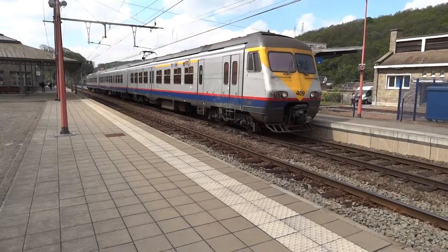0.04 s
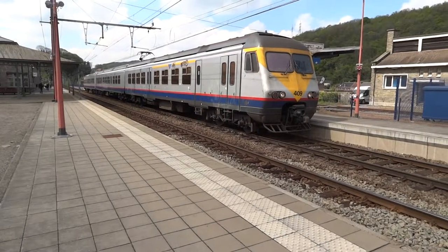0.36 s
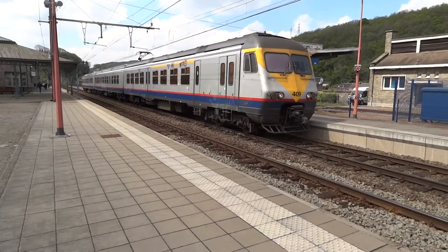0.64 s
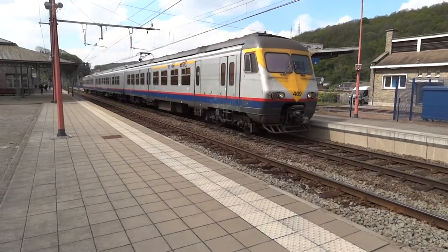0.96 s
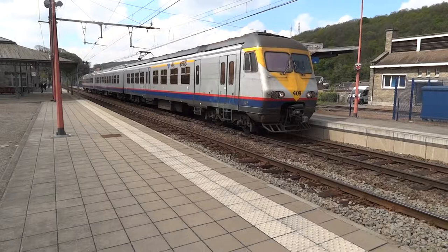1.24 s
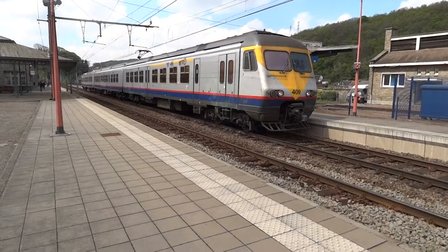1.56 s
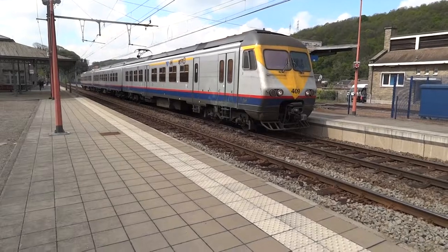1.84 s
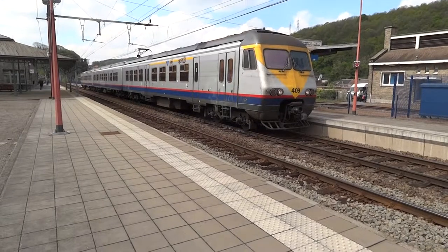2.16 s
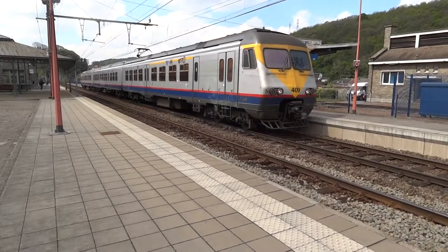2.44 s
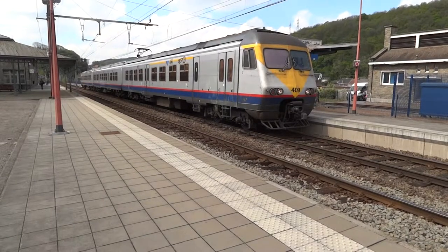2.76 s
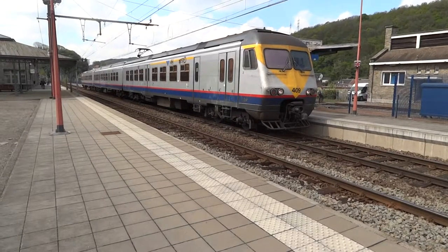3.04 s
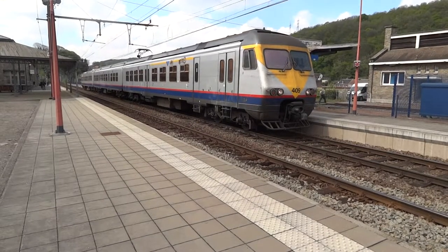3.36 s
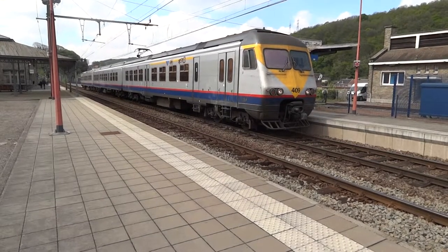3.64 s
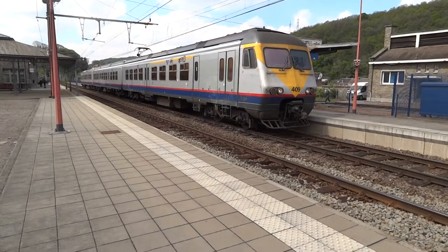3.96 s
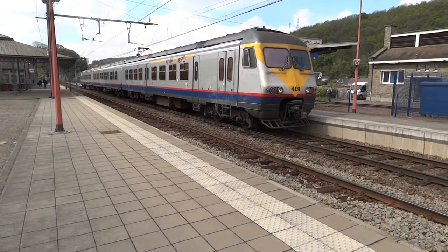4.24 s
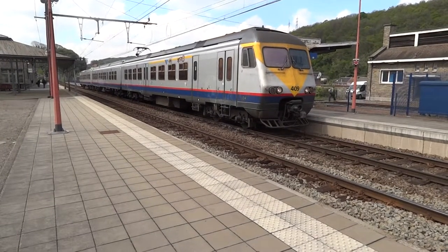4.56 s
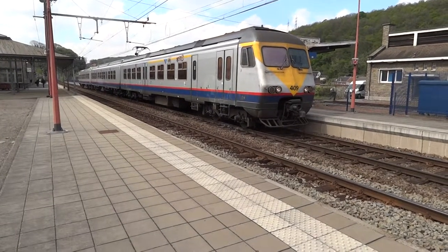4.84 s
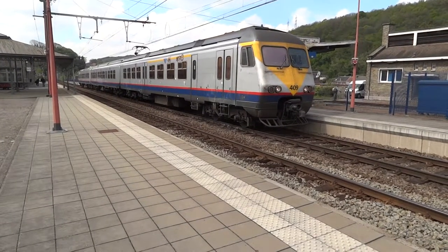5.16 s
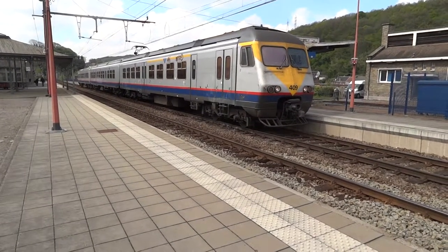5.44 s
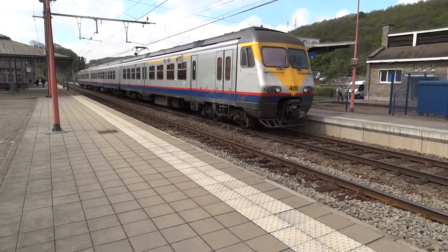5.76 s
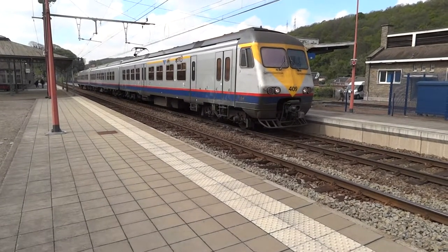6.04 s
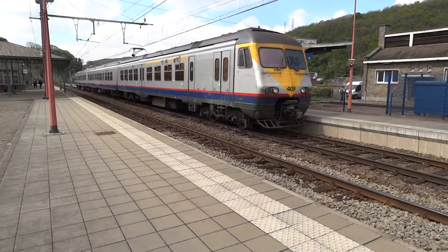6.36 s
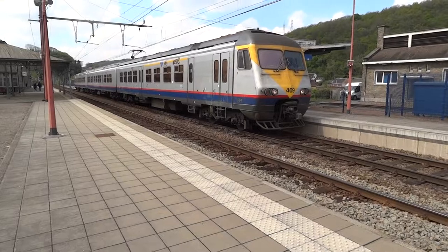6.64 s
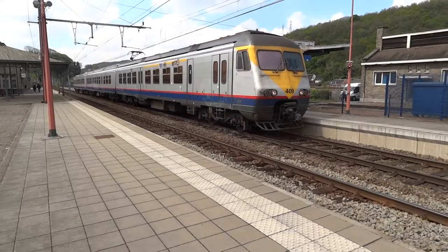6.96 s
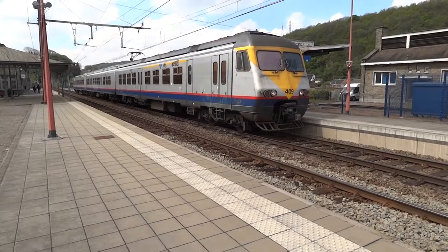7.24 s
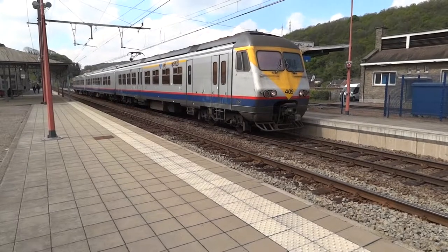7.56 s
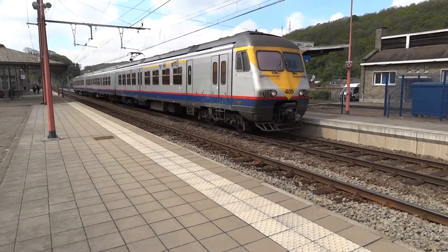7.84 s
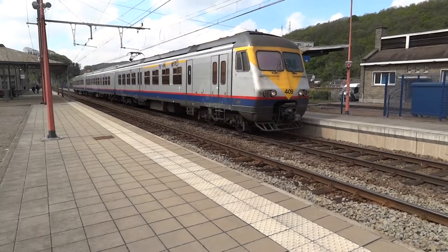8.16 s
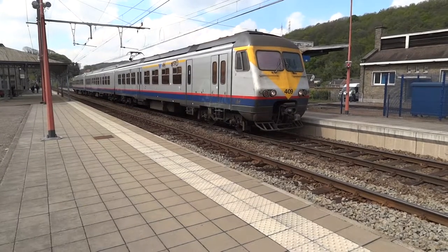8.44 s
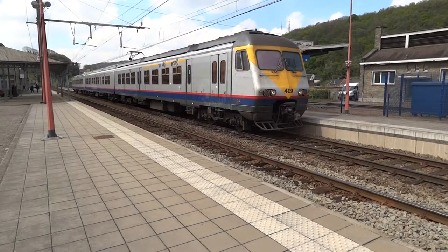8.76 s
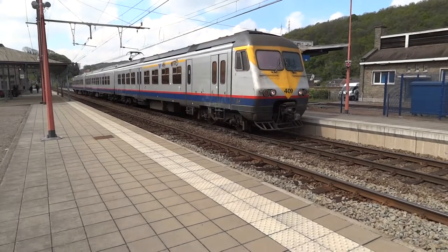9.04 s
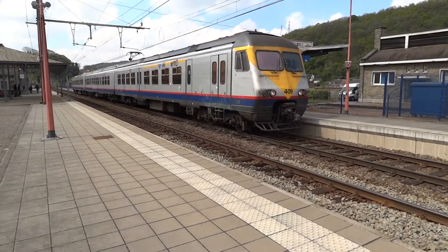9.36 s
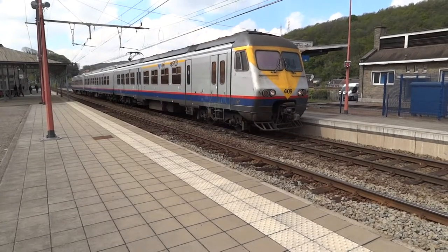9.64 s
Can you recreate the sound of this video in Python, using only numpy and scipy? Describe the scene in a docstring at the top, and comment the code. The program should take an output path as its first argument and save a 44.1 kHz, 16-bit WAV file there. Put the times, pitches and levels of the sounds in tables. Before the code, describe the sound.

An electric train stands at an open-air platform. Throughout, its steady, many-toned whine sits slightly to the right, over the rush and low hum of cooling fans. Fingers knock and rub on a hand-held camera right at the microphone: a sharp cluster in the first half second, light taps near 1.4 and 2.5 seconds, stronger knocks around 5.1, 5.4 and 6.1, and smaller ones near 7.1 and 9. The camera's zoom motor makes a thin, rapid ticking from about 2.2 to 4.3 seconds and starts again at 9.7. A soft low rumble swells around 3.6 seconds, then more weakly near 7 and 9. Small birds twitter faintly with a slight echo from the walls, whistling and trilling around 1.4 to 2 seconds, chirping sparsely afterwards, and growing busier from 8.2 to 9 with a run of paired chirps.

```python
"""Open-air station platform. A standing electric train's converter whines on harmonics of 269 Hz
over the rush and hum of cooling fans; a low rumble swells and fades. Small birds twitter nearby,
echoed by the walls. Fingers knock and rub on a hand-held camera, ringing its case; its zoom motor
ticks for two seconds and starts again at the very end."""
import sys
import numpy as np
from scipy import signal
from scipy.fft import rfft, irfft
from scipy.io import wavfile
from scipy.ndimage import uniform_filter1d

SR = 44100
rng = np.random.default_rng(int(sys.argv[2]) if len(sys.argv) > 2 else 0)


def unload_audio(sound):
    """Save the sound as a 16-bit wav file, at the path given as the first command line argument."""
    columns = np.transpose(np.atleast_2d(sound))
    # keep every value between -1 and 1, then stretch to whole-number steps
    steps = np.round(np.clip(columns, -1, 1) * 32767)
    wavfile.write(sys.argv[1], SR, steps.astype(np.int16))


N = 431738
TIME = np.arange(N) / SR


# switching rate: t/s, f/Hz
SWITCHING = [(0, 268.68), (5.8, 269.24), (9.79, 269.0)]
# steady harmonics: multiple, level/dB
HARMONICS = [(3, -73.5), (4, -61.5), (5, -65), (6, -61.5), (7, -60), (8, -71), (9, -68), (10, -71.5),
             (11, -69), (14, -55), (15, -59.5), (16, -67), (17, -64), (18, -63), (19, -78), (20, -73),
             (21, -70), (22, -62), (23, -61.5), (25, -59), (26, -74), (27, -84), (28, -79), (29, -88.5),
             (31, -87), (33, -84.5), (35, -89.5)]
# swelling harmonics: t/s, level before trim/dB
LEVEL_12TH = [(0.5, -55.5), (5.08, -59.5), (7.02, -57.5), (9.79, -63.5)]
LEVEL_13TH = [(0.45, -52), (1.46, -49.5), (5.11, -53.5), (5.39, -49.5), (8.64, -43.5), (9.79, -46.5)]
LEVEL_24TH = [(0.45, -53), (0.89, -63), (5.42, -53), (5.62, -56.5), (9.21, -53.5), (9.79, -59)]
# multiple, level curve, trim/dB
STRONGEST = [(12, LEVEL_12TH, 6.5), (13, LEVEL_13TH, 3.5), (24, LEVEL_24TH, -0.5)]

def converter(fade_db=1.6, flutter_db=0.4, waver_rad=0.14, pan_db=-2.5, wander_db=-2.9, left_lag_s=26e-6):
    """Switching harmonics from the right; moving air makes each flutter and shift between the ears."""
    hz = in_time(SWITCHING)
    phase = 2 * np.pi * (np.cumsum(hz) / SR - hz.mean() * np.array([[left_lag_s], [0]]))
    levels = [(k, db + fade_db * drift(0.57)) for k, db in HARMONICS]
    levels += [(k, in_time(curve) + trim_db) for k, curve, trim_db in STRONGEST]
    out = np.zeros((2, N))
    for k, db in levels:
        tone = np.sqrt(2) * np.sin(k * phase + rng.uniform(0, 2 * np.pi) + waver_rad * drift(2.7))
        gain = from_db(db + flutter_db * drift(7.9))
        out += tone * panned(gain, pan_db + wander_db * drift(0.57))
    return out


# air rush: f/Hz, density/(dB per Hz)
FAN_SPECTRUM = [(25, -69.5), (40, -71), (56, -66), (95, -72), (145, -76.5), (220, -66.5), (320, -75),
                (520, -82.5), (820, -78), (1300, -86.5), (2600, -91.5), (4200, -88.5), (7500, -109),
                (15000, -120)]
# fan and duct resonances: f/Hz, nominal width/Hz, relative level/dB
DUCT_MODES = [(55.3, 5.5, -61), (81.8, 2.3, -57.5), (112.5, 4.4, -57), (269.6, 6.1, -56), (411.2, 13, -56),
              (546, 10.5, -64.5), (810, 6.7, -55), (872, 9.3, -59.5), (11940, 130, -76)]

def fans(unrest_db=1.39, duct_db=-4.5):
    """Broad rush of cooling air with humming duct resonances."""
    hum = sum(from_db(db + duct_db) * noise_band(hz, 1.74 * width) for hz, width, db in DUCT_MODES)
    return wide(FAN_SPECTRUM) * from_db(unrest_db * drift(2.95)) + hum


# t/s, level/dB, f/Hz, hardness (overtone over fundamental)/dB
KNOCKS = [(.130, -22, 400, -18), (.148, -15.5, 205, -30), (0.1529, -11, 303, -25), (.171, -17, 224, -10),
          (.210, -19, 1010, 2), (.2268, -9, 1200, 28), (.2305, -14.5, 900, 4), (.2622, -17, 335, -1),
          (.268, -17.5, 179, -3), (.402, -11, 275, -5), (.4083, -13, 1050, 12), (1.382, -24, 227, -2),
          (1.467, -25.5, 274, -7), (2.461, -19, 1280, 11), (2.7815, -33, 1800, -6), (4.329, -32, 1550, 20),
          (4.512, -29, 560, 12), (4.9405, -33, 2600, 12), (5.1478, -10.5, 427, 11),
          (5.198, -28.5, 262, -20), (5.358, -19.5, 302, -4), (5.3728, -19, 1400, -2),
          (6.1269, -11.5, 1220, 3), (6.193, -27.5, 364, -16), (6.533, -26.5, 375, -3),
          (6.855, -35, 2200, 12), (7.109, -23, 370, 0), (7.18, -18.5, 238, -28), (9.0274, -25, 396, -5.5)]

def knocks(overtone_ratio=2.84, damping=0.71, rattle=0.41, rattle_s=0.0014,
           edge_hz=3600, edge_width_hz=4000, edge_db=-14.5, lag_cycles=0.14, lag_corner_hz=3000):
    """A finger rings the case for about two cycles; harder touches add an overtone and a crisp edge."""
    out, t = np.zeros((2, N)), TIME[:SR // 20]
    for s, db, pitch_hz, hard_db in KNOCKS:
        noise = rng.standard_normal(len(t)) + rng.standard_normal((2, len(t)))
        loose = rattle * np.exp(-t / rattle_s) * noise
        low_db, high_db = db - max(hard_db, 0), db + min(hard_db, 0)
        overtone_hz = overtone_ratio * pitch_hz
        for hz, ring_db in (pitch_hz, low_db), (overtone_hz, high_db):
            force = (t == 0) + loose * hz / (hz + edge_hz)
            body = resonate(resonate(force, hz, damping * hz), hz, 2 * hz)
            # left channel slightly after the right; the lag shrinks as pitch rises
            lag_s = lag_cycles / hz / (1 + (hz / lag_corner_hz) ** 2)
            body[0] = np.interp(t - lag_s, t, body[0], left=0)
            add(out, s, from_db(ring_db) * peak_one(body))
        # duller edge on low touches
        edge = resonate((t == 0) + loose, np.sqrt(overtone_hz * edge_hz), edge_width_hz)
        edge = resonate(edge, edge_hz / 2, 2 * edge_width_hz)
        add(out, s, from_db(high_db + edge_db) * peak_one(edge))
    return out


# slides: centre t/s, half length/s, level/dB
RUBS = [(.224, 0.017, -32), (0.267, 0.0073, -31), (0.34, 0.33, -48.5), (5.366, 0.012, -32),
        (5.395, 0.066, -42.5), (5.535, 0.056, -41), (5.6, 0.17, -48), (6.67, 0.02, -45),
        (9.319, 0.0091, -46), (9.373, 0.082, -49)]
# friction: f/Hz, relative density/dB
RUB_SPECTRUM = [(150, 2.5), (400, -8.5), (1600, -3), (3000, -7), (5000, -7), (7500, -18.5), (15000, -35)]
# f/Hz, width/Hz, gain/dB
CASE_MODES = [(500, 91, 2.5), (1680, 380, -13.5)]

def rubs(grain_db=1.5):
    """Sliding skin makes grainy friction that rings the hollow case."""
    friction = swells(RUBS) * rms_one(wide(RUB_SPECTRUM) * from_db(grain_db * drift(170)))
    return friction + sum(from_db(db) * resonate(friction, hz, width) for hz, width, db in CASE_MODES)


# lever pushes: t/s, length/s
ZOOM_PUSHES = [(2.2297, .99), (3.2297, 1.09), (9.7085, 1.0)]
# beep choices: f/Hz
BEEPS_HZ = (7620, 8010, 8010, 8010, 8010, 8010, 8410, 8410)
# f/Hz, relative density/dB
WHIRR_SPECTRUM = [(2000, -27), (3300, -9), (4200, 10), (5000, 12), (5900, 8), (7000, -15), (9500, -14),
                  (10800, -5), (15000, -36)]

def zoom_motor(steps_per_s=50, tick_hz=4400, tick_width_hz=1100, weak_db=-4, beep_db=-29, whirr_db=-26,
               level_db=-37, swell_db=4.5, peak_share=.72):
    """The lens steps in weak and strong ticks over a whirr, beeping on the strong; each push swells."""
    steps, effort, t = np.zeros(N), np.zeros(N), TIME[:SR // steps_per_s]
    for start, length in ZOOM_PUSHES:
        for k, s in enumerate(np.arange(start, min(start + length, TIME[-1]), 1 / steps_per_s)):
            strong = k % 2
            hz = tick_hz * (1 + rng.normal(0, 0.05))
            tick = resonate(resonate(1.0 * (t == 0), hz, tick_width_hz), hz, tick_width_hz)
            tick_db = (0 if strong else weak_db) + rng.normal(0, 1.5)
            add(steps, s, from_db(tick_db) * peak_one(tick))
            push = np.interp((s - start) / length, [0, peak_share, 1], [0, 1, 0])
            add(effort, s, np.full(len(t), from_db(level_db + swell_db * push)))
            if strong:
                beep = np.sin(2 * np.pi * rng.choice(BEEPS_HZ) * t) * signal.windows.tukey(len(t), .15)
                add(steps, s, from_db(beep_db) * beep)
    return effort * (steps + from_db(whirr_db) * rms_one(wide(WHIRR_SPECTRUM)))


def bird_note(length_s, start_hz, top_hz, end_hz, turn, db, quaver=0.008):
    """A whistle that tops out at share `turn` of its length, then drops; strong quaver makes it rasp."""
    u = np.linspace(0, 1, int(length_s * SR))
    climb = (start_hz - top_hz) * np.abs(1 - u / turn) ** 1.5
    fall = (end_hz - top_hz) * np.abs((u - turn) / (1 - turn)) ** 1.5
    jitter = rms_one(uniform_filter1d(rng.standard_normal(len(u)), size=60))
    hz = (top_hz + np.where(u < turn, climb, fall)) * (1 + quaver * jitter)
    return from_db(db) * signal.windows.tukey(len(u), .12) * np.sin(2 * np.pi * np.cumsum(hz) / SR)


# t/s, length/s, relative level/dB
CHIRPS = [(.882, .058, -49), (2.632, .046, -45), (4.843, .04, -47), (6.54, .046, -42), (7.385, .048, -46),
          (8.355, .044, -42), (8.448, .048, -37)]
# start f/Hz, top f/Hz, end f/Hz, turn/share
CHIRP_SHAPE = (4150, 5250, 3850, .76)
# t/s, length/s, top f/Hz, turn/share, relative level/dB
WHISTLES = [(1.41, .1, 4400, .5, -44), (1.585, .075, 4950, .25, -40), (1.745, .038, 5150, .7, -42),
            (4.882, .028, 5200, .7, -49), (4.93, .055, 5100, .9, -51), (8.222, .04, 4550, .85, -38)]
# t/s, length/s, top f/Hz, end f/Hz, relative level/dB
RASPS = [(8.194, 0.026, 4850, 4100, -40), (8.326, 0.095, 6030, 5730, -50),
         (8.421, 0.047, 4840, 3940, -36.5)]
# start t/s, end t/s, rate/(notes per s), first and last relative level/dB
TRILLS = [(1.785, 1.937, 60, -40, -47), (8.165, 8.203, 56, -43, -45)]
# a farther bird's low, rough answers: t/s
ANSWERS_S = [1.7, 2.31, 2.69, 3.66, 6.62, 7.46, 8.451]
# trill and answer notes: length/s, start f/Hz, top f/Hz, end f/Hz, turn/share
TRILL_SHAPE = (0.0066, 3100, 4850, 4150, 0.082)
ANSWER_SHAPE = (.1, 3050, 3100, 2800, .2)

def birds(level_db=-2, pan_db=-5, echo_db=-5.5, echo_s=0.065, rasp=0.045, whistle_sag=.15,
          run_start_s=8.534, pair_every_s=.154, pair_gap_s=.069, run_chirp_s=.038, run_db=-40.5):
    """Chirps, whistles, rasps, trills and a closing run of paired chirps, scattered by station walls."""
    song = np.zeros(N)
    run = [(run_start_s + k // 2 * pair_every_s + k % 2 * pair_gap_s, run_chirp_s, run_db)
           for k in range(6)]
    for s, length, db in CHIRPS + run:
        *pitches, turn = CHIRP_SHAPE
        detune = 1 + .008 * rng.standard_normal()
        add(song, s, bird_note(length, *np.array(pitches) * detune, turn, db))
    for s, length, hz, turn, db in WHISTLES:
        start_hz, end_hz = hz * (1 - whistle_sag * turn), hz * (1 - whistle_sag * (1 - turn))
        add(song, s, bird_note(length, start_hz, hz, end_hz, turn, db))
    for s, length, hz, end_hz, db in RASPS:
        add(song, s, bird_note(length, hz, hz, end_hz, turn=0.136, db=db, quaver=rasp))
    for s in ANSWERS_S:
        add(song, s, bird_note(*ANSWER_SHAPE, db=-54, quaver=rasp))
    for start, end, per_s, first_db, last_db in TRILLS:
        for s in np.arange(start, end, 1 / per_s):
            add(song, s, bird_note(*TRILL_SHAPE, db=np.interp(s, [start, end], [first_db, last_db])))
    walls = rng.standard_normal((2, SR // 2)) * np.exp(-TIME[:SR // 2] / echo_s)
    echo = signal.fftconvolve(song[None], walls / np.linalg.norm(walls[0]), axes=1)[:, :N]
    return from_db(level_db) * (panned(song, pan_db) + from_db(echo_db) * echo)


# centre t/s, half length/s, level/dB
RUMBLE_SWELLS = [(3.6, 0.91, -48.5), (7.0, .7, -53.5), (9.1, 0.47, -54)]

def rumble():
    """Dull, slowly swelling bass."""
    return swells(RUMBLE_SWELLS) * noise_band(hz=56, width_hz=45)


# f/Hz, side over mid/dB
STEREO_WIDTH = [(30, -40), (80, -24), (160, -27.5), (350, -10.5), (700, -10.5), (1500, -5.5), (4000, -10),
                (12000, -18)]

def wide(spectrum):
    """Stereo noise, nearly mono in the bass."""
    side = shaped(coloured(spectrum), STEREO_WIDTH)
    return coloured(spectrum) + np.array([side, -side])


def coloured(spectrum):
    """Noise from rows of f/Hz, density/(dB per Hz)."""
    return shaped(rng.standard_normal(N), spectrum) * np.sqrt(SR / 2)


def shaped(x, curve):
    """Filter by rows of f/Hz, gain/dB on a log-frequency axis."""
    knots_hz, db = np.transpose(curve)
    hz = np.fft.rfftfreq(N, 1 / SR)
    return irfft(rfft(x) * from_db(np.interp(np.log(hz + 1), np.log(knots_hz), db)), N)


def noise_band(hz, width_hz):
    """Noise through the same resonance twice, rms 1."""
    return rms_one(resonate(resonate(rng.standard_normal(N), hz, width_hz), hz, width_hz))


def resonate(x, hz, width_hz):
    """One resonance, peak gain 1."""
    r = np.exp(-np.pi * width_hz / SR)
    feedback = [1, -2 * r * np.cos(2 * np.pi * hz / SR), r * r]
    return signal.lfilter(np.array([1, 0, -1]) * (1 - r * r) / 2, feedback, x)


def drift(rate_hz):
    """Smooth random wander, rms 1."""
    hop, settle = 100, 2000
    r = np.exp(-2 * np.pi * rate_hz * hop / SR)
    slow = signal.lfilter([1], [1, -2 * r, r * r], rng.standard_normal(N // hop + settle + 2))[settle:]
    return np.interp(np.arange(N) / hop, np.arange(len(slow)), rms_one(slow))


def swells(rows):
    """Bell-shaped gains from rows of centre t/s, half length/s, level/dB."""
    return sum(from_db(db) * np.exp(-((TIME - s) / half) ** 2) for s, half, db in rows)


def in_time(curve):
    """Rows of t/s, value, interpolated to every sample."""
    return np.interp(TIME, *np.transpose(curve))


def panned(x, pan_db):
    """Mono to stereo; pan_db is left over right."""
    return np.array([x * from_db(pan_db / 2), x * from_db(-pan_db / 2)])


def add(out, start_s, x):
    """Mix x in at start_s."""
    i = int(start_s * SR)
    out[..., i:i + x.shape[-1]] += x[..., :N - i]


def from_db(db):
    return 10 ** (np.asarray(db) / 20)


def rms_one(x):
    return x / np.sqrt(np.mean(x ** 2) + 1e-20)


def peak_one(x):
    return x / np.abs(x).max()


def scene():
    """Train and birds on the platform, handling sounds right at the microphone."""
    platform = converter() + fans() + rumble() + birds()
    handling = knocks() + rubs()
    # the case swallows a treble band
    handling -= 0.52 * resonate(handling, hz=8800, width_hz=3000)
    return platform + handling + zoom_motor()


def record(dry, low_cut_hz=22, high_cut_hz=15700):
    """Cut the deepest rumble and the top treble."""
    dry = signal.sosfilt(signal.butter(2, low_cut_hz, "high", fs=SR, output="sos"), dry)
    return signal.sosfilt(signal.ellip(10, .1, 80, high_cut_hz, fs=SR, output="sos"), dry)


dry = scene()
out = record(dry)
unload_audio(out)
```